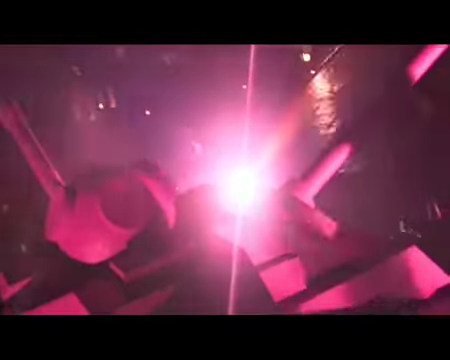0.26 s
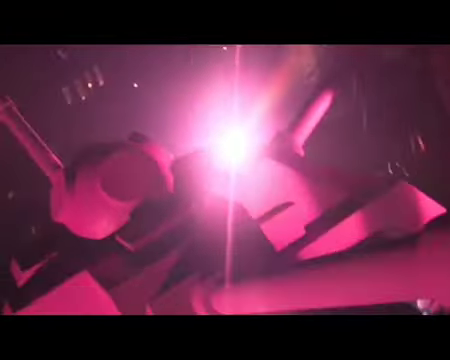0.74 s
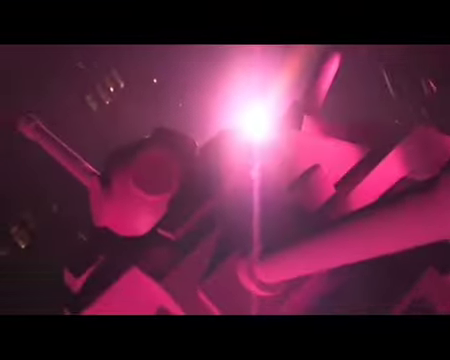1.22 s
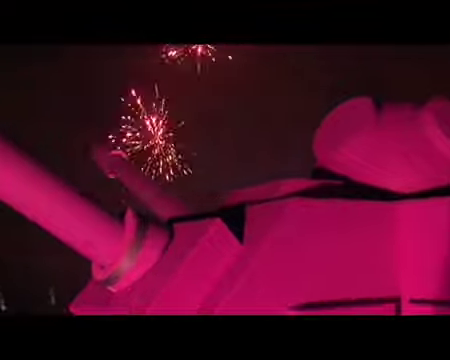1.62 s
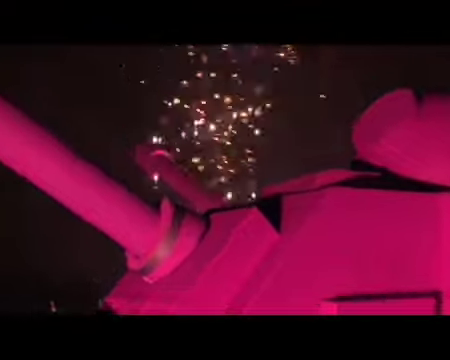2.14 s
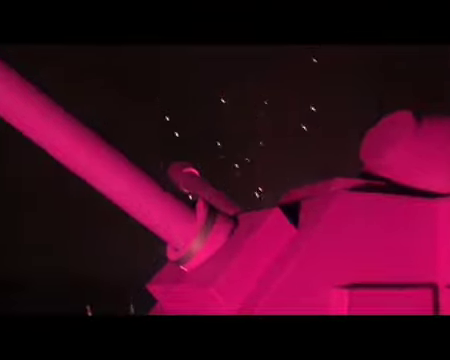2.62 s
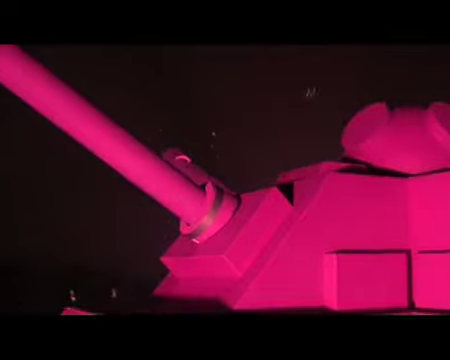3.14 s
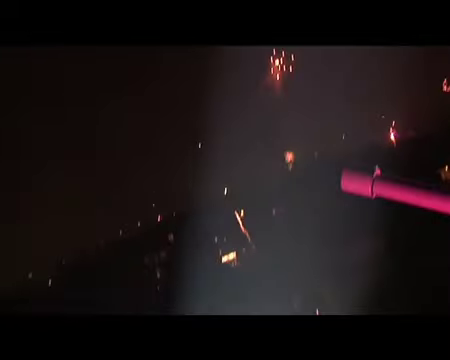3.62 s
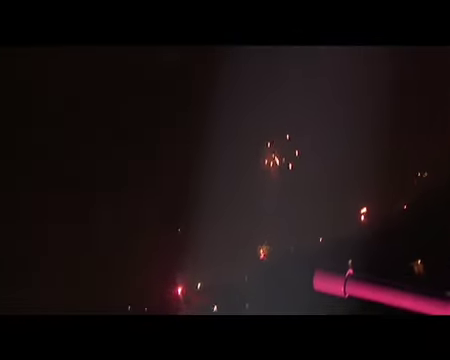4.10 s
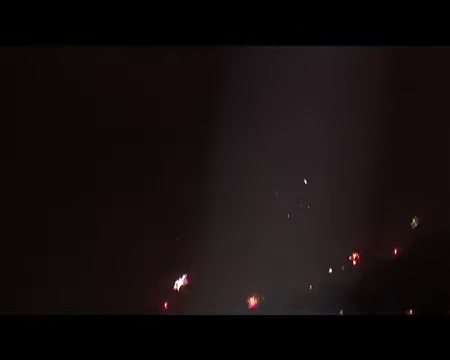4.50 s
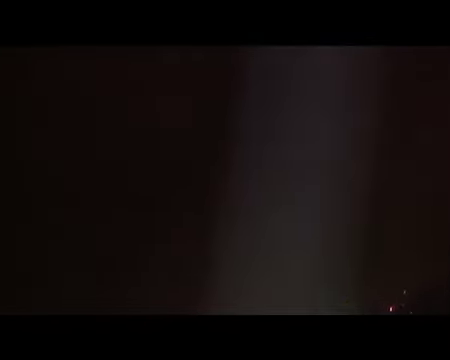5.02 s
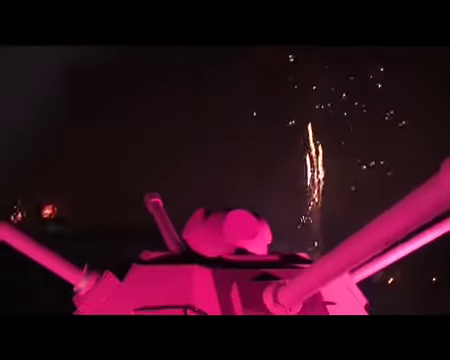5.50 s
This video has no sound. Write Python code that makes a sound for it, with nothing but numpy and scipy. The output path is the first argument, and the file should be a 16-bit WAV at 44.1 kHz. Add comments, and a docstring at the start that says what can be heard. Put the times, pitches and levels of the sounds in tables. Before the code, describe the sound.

Blunt mid-low bangs come irregularly from the start, with smaller pops a few streets away. Soon after one sharp bang, a brief hiss turns into dense crackle with bright snaps, fading over about a second. Later the heaviest cracks arrive, including a tight cluster near the end. A constant muffled barrage fills the night city; close wall slaps, clipped peaks, limited treble and a barely audible whine suggest a small camera.

```python
"""Shells and firecrackers bang near by at night: ringing thumps with steep cracks, thrown back by walls.
One bang trails a hiss, then a shell overhead sheds a cloud of crackling stars: tiny random puffs of noise
plus louder single snaps. Behind them countless far pops all over a city merge into a dull roar of
shaped noise. One overloaded camera microphone hears it all, with a housing reflection and a faint whine."""
import sys
import numpy as np
from scipy import signal
from scipy.fft import rfft, irfft
from scipy.io import wavfile

SR = 44100
rng = np.random.default_rng(int(sys.argv[2]) if len(sys.argv) > 2 else 0)


def bounce(signal):
    """Save signal as a 16-bit WAV file at the path given by the first command-line argument."""
    frames = np.transpose(np.atleast_2d(signal))
    limited = np.clip(frames, -1, 1)
    pcm = np.round(limited * 32767).astype(np.int16)
    wavfile.write(sys.argv[1], SR, pcm)


N = 254016
WALL_S = 0.029  # delay of the echo from the nearest walls

# relative spectrum of a crackling star: pitch_hz [Hz], level_db [dB per Hz]
STAR_SPECTRUM = [(1200, -25), (2500, 0), (4000, -3), (6000, -8), (8500, -20.5), (11500, -24), (13500, -34),
                 (16000, -55)]


def gain_of(db):
    """Decibels to a factor."""
    return 10 ** (np.asarray(db) / 20)


def evened(x):
    """Scales to rms 1."""
    return x / np.sqrt(np.mean(x ** 2) + 1e-20)


def read(points, hz):
    """Reads a curve at hz, with straight lines between its points over log frequency."""
    f, value = np.transpose(points)
    return np.interp(np.log(hz + 1), np.log(f + 1), value)


def add(mix, start_s, sound):
    """Adds a sound to the mix at its start time, cut off at the end of the scene."""
    part = mix[round(start_s * SR):][:len(sound)]
    part += sound[:len(part)]


def colour(x, points):
    """Causal (minimum-phase) filter with the given relative spectrum: nothing rings before a click."""
    hz = abs(np.fft.fftfreq(8192, 1 / SR))
    log_gain = np.log(gain_of(np.maximum(read(points, hz), -100)))
    response = np.exp(np.conj(signal.hilbert(log_gain)))
    taps = np.fft.ifft(response).real[:4096]
    return signal.oaconvolve(x, taps / np.linalg.norm(taps))[:len(x)]


def scatter(db, t60_s, rise_s, late_s=0):
    """Noise that the surroundings send back: it swells quickly after a delay, then dies."""
    t = np.maximum(np.arange(SR // 2) / SR - late_s, 0)
    envelope = gain_of(db - 60 * t / t60_s) * (1 - np.exp(-t / rise_s))
    return envelope * rng.standard_normal(len(t))


def popping(per_s, size_db, t60_s):
    """A random train of pops, a few of them large, each a short dying puff of noise."""
    happens = rng.random(N) < per_s / SR
    size = gain_of(size_db * np.minimum(rng.exponential(1, N), 4)) * happens
    puff = gain_of(-60 * np.arange(SR // 4) / SR / t60_s)
    power = signal.oaconvolve(size ** 2, puff ** 2)[:N]  # overlapping puffs add in power
    return np.sqrt(abs(power)) * rng.standard_normal(N)


def blast(pitch_hz, cycles, rise_ms):
    """A push and pull of air: a decaying sine with a rounded onset."""
    t = np.arange(SR // 2) / SR
    onset = 1 - np.exp(-(1000 * t / rise_ms) ** 2)
    return np.sin(2 * np.pi * pitch_hz * t + 1.0) * np.exp(-pitch_hz * t / cycles) * onset


def bangs():
    """Each shell or pop rings a few cycles, scatters off its surroundings, then returns from the walls."""
    # shells bursting near by: start_s [s], blast_db [dB], pitch_hz [Hz], ring [cycles], rise [ms],
    # scatter [dB re blast], scatter t60 [s], wall echo [dB re blast]
    shells = [(0.0426, 3, 405, 2.1, 3.6, -13.5, 0.099, -16), (0.4935, -1, 520, 0.76, 1.1, -6.5, 0.13, -5.5),
              (0.624, 5.5, 564, 2.5, 1.4, -11.5, 0.13, -14.5), (0.744, -3, 263, 5.3, 0.4, -4.5, 0.44, -4),
              (1.319, 1, 330, 0.96, 0.052, -6, 0.42, -9), (1.953, 0.5, 410, 2, 2.4, -10.5, 0.17, -7.5),
              (2.276, -9, 595, 1.8, 1.1, -2, 0.19, -16), (2.3, 2.5, 425, 1, 0.083, -7.5, 0.32, -29),
              (4.0291, 5.5, 586, 0.71, 0.35, -12, 0.097, -12), (4.404, -2.5, 226, 2, 5.2, -30, 0.11, -25),
              (4.5716, -2, 142, 1.6, 0.8, -5, 0.23, -6), (4.5983, 3.5, 422, 1.9, 0.03, -7, 0.2, -30),
              (5.0242, 2.5, 543, 1.1, 1.1, -9.5, 0.11, -8.5),
              (5.4108, 4, 453, 0.43, 0.053, -8.5, 0.23, -8.5),
              (5.65, -3.5, 704, 3.6, 1.1, -8.5, 0.093, -13)]
    # pops a few streets away that stand out of the roar: start_s [s], blast_db [dB], pitch_hz [Hz]
    street_pops = [(0.0698, -1, 510), (0.5279, -15, 550), (0.779, 0.5, 298), (0.798, -8, 596),
                   (0.8496, -10.5, 435), (1.392, -6, 400), (1.4172, -6, 400), (1.4395, -1.5, 387),
                   (1.5554, -8, 460), (1.6603, -4, 434), (1.754, -5, 490), (1.8636, -1.5, 740),
                   (1.8997, -5, 495), (2.0665, -5, 650), (2.226, -1, 434), (2.313, -3, 453),
                   (2.365, -7.5, 600), (2.352, -16, 370), (2.395, -6, 447), (2.4268, -8, 510),
                   (2.4676, -1.5, 453), (2.523, -5, 432), (2.771, -3.5, 440), (2.877, -12.5, 605),
                   (3.0292, -5.5, 560), (3.118, -3.5, 363), (3.409, -3.5, 584), (3.45, -2.5, 330),
                   (3.6805, -11, 427), (3.8574, -6, 504), (3.957, -13, 600), (4.064, -6, 970),
                   (4.1988, -8.5, 363), (4.2398, -6.5, 420), (4.4754, -8, 450), (4.733, -6, 490),
                   (4.952, -5.5, 540), (5.206, -4.5, 740), (5.472, -5.5, 496), (5.522, -3.5, 700),
                   (5.557, -5, 800), (5.6032, -8, 434), (5.7102, -6.5, 626)]
    # relative spectrum of the scattered blast: pitch_hz [Hz], level_db [dB per Hz]
    blast_spectrum = [(15, -44), (25, -31), (97, -15), (319, -3.5), (401, -5.5), (835, -11), (936, -6),
                      (1260, -16), (2190, -25), (6000, -53.5), (7800, -90), (13200, -120)]
    # blast back from the walls, thinner in the bass: pitch_hz [Hz], level_db [dB per Hz, relative]
    wall_spectrum = [(60, -47), (200, -0.5), (400, 3), (900, 3.5), (1300, -5.5), (2200, -13), (4000, -24.5),
                     (7000, -43.5), (12000, -65)]
    pop_settings = (1.23, 0.35, -11.5, 0.2, -10)  # the last five columns of the shells, same for each pop
    pops = [(*row, *pop_settings) for row in street_pops]
    direct, walls = np.zeros(N), np.zeros(N)
    for start_s, blast_db, pitch_hz, cycles, rise_ms, scatter_db, t60_s, wall_db in shells + pops:
        emphasis = [(pitch_hz / 3, -7), (pitch_hz, 0), (pitch_hz * 3, -7)]  # stands out around its pitch
        points = blast_spectrum + [(pitch_hz, read(blast_spectrum, pitch_hz))]
        shape = sorted((f, level + read(emphasis, f)) for f, level in points)
        scattered = colour(scatter(scatter_db, t60_s, 0.00099), shape)
        add(direct, start_s, gain_of(blast_db) * (blast(pitch_hz, cycles, rise_ms) + scattered))
        add(walls, start_s, scatter(blast_db + wall_db, 0.1, 0.011, WALL_S))
    return direct + colour(walls, wall_spectrum)


def cracks():
    """Steep fronts: a click, a burst a few ms long, a thin scattered hiss and a wall echo; air dulls some."""
    # sharp fronts of bangs and their single bounces off walls: start_s [s], front_db [dB],
    # scatter [dB re front], wall echo [dB re front], brightness [dB per octave]
    fronts = [(0.069, -19, -14, -21, -6), (0.6277, -27, -18, -21, 2), (0.7445, -11, -16, -24, 3.5),
              (0.78, -15.5, -9, -25, 0.5), (0.786, -12.5, -18, -27, -6), (1.319, -21, -13, -20, 11),
              (1.348, -22, -13, -30, 7), (1.358, -22, -14, -25, 1), (1.9, -20, -7, -18, -5),
              (2.2771, -10, -4, -19, -12), (2.288, -19, -10.5, -23, -2), (2.3, -14.5, -14, -14, 3.5),
              (2.352, -21, -11, -14, -2), (3.4459, -21, -11, -20, -5), (4.0291, -37, -20, -23, 10),
              (4.066, -17, -8, -25, -16), (4.599, -9, -19, -18, 2.5), (4.6048, -5.5, -25, -19, -2.5),
              (4.608, -22, -18, -21, -1.5), (5.411, -18, -16, -21, 8.5), (5.4142, -6, -18, -31, -3.5),
              (5.424, -9.5, -13, -25, -1), (5.433, -11.5, -14, -22, -3.5), (5.6503, -15.5, -21, -27, -3.5)]
    # relative spectrum of a front before its brightness tilt: pitch_hz [Hz], level_db [dB per Hz]
    front_spectrum = [(500, -29), (1200, -4), (2000, 9), (3000, 4), (5000, -3.5), (8000, -16.5),
                      (11500, -28.5), (13500, -36), (16000, -34)]
    # the loudest single stars: start_s [s], snap_db [dB]
    snaps = [(0.865, -36), (1.431, -33), (1.612, -33), (1.723, -39), (1.657, -31), (1.69, -35), (1.79, -28),
             (1.828, -29), (1.8708, -17), (1.912, -26), (1.953, -30), (1.985, -28), (2.0083, -21),
             (2.0646, -22), (2.095, -21), (2.1176, -27), (2.141, -21), (2.178, -30), (2.1913, -31),
             (2.217, -21), (2.234, -25), (2.272, -28), (2.31, -18.5), (2.429, -24), (2.4466, -29),
             (2.5373, -29), (2.6177, -34), (2.8162, -34), (2.836, -33), (2.85, -27), (2.9703, -34),
             (3.018, -34), (4.3214, -35), (4.7325, -31), (5.512, -35)]
    snap_settings = (-16, -25, 0.7)  # scatter and wall echo [dB re snap], brightness [dB per octave]
    events = [(*row, front_spectrum) for row in fronts]
    events += [(*row, *snap_settings, STAR_SPECTRUM) for row in snaps]
    out = np.zeros(N)
    for start_s, level_db, scatter_db, wall_db, tilt_db, spectrum in events:
        burst = scatter(-1.0, 0.011, 0.0001)
        hiss = scatter(scatter_db, 0.1, 0.0011)
        echo = scatter(wall_db, 0.085, 0.0015, WALL_S)
        crack = burst + hiss + echo
        crack[0] += 4.0  # the click
        shape = [(f, level + tilt_db * np.log2(f / 5000)) for f, level in spectrum]
        add(out, start_s, gain_of(level_db) * colour(crack, shape))
    return out


def tail_and_stars():
    """Random crackle over hiss: first the hissing tail of a shell, then a cloud of many small stars."""
    # level of the hissing tail of the shell at 1.32 s, then of the star cloud from 1.58 s:
    # start_s [s], level_db [dB]
    course = [(1.33, -34.5), (1.58, -44.5), (1.68, -37.5), (2.0, -38.5), (2.55, -43), (2.65, -51),
              (3.1, -60)]
    start_s, level_db = np.transpose(course)
    crackle = evened(popping(per_s=560.0, size_db=4.5, t60_s=0.013))
    hiss = rng.standard_normal(N)
    level = gain_of(np.interp(np.arange(N) / SR, start_s, level_db, left=-120, right=-120))
    return level * evened(colour(crackle + hiss, STAR_SPECTRUM))


def barrage():
    """Far pops overlap into a roar that brightens when nearer streets join in."""
    # course of the roar: start_s [s], level_db [dB], brightness [dB per octave above 1 kHz]
    course = [(0.0, -17, 2), (0.4, -19, 1.5), (0.66, -19.5, 2), (1.3, -19.5, 1.5), (1.52, -18, 0.5),
              (1.73, -18, 0), (2.17, -19, 1), (2.44, -17, 0), (2.84, -18, 1.5), (3.34, -18.5, 1.5),
              (4.32, -21, 2.5), (4.49, -19, 2), (4.62, -16.5, 2.5), (5.44, -19.5, 2.5), (5.61, -15, 2),
              (5.76, -17, 2.5)]
    # relative spectrum of the roar before its brightness tilt: pitch_hz [Hz], level_db [dB per Hz]
    roar_spectrum = [(15, -65), (25, -33), (50, -34), (97, -18), (217, -4), (309, -3), (430, -3), (660, -6),
                     (950, -6.5), (1330, -18.5), (2110, -24), (3000, -32), (5000, -46), (8000, -61),
                     (12000, -70.5), (16000, -78)]
    start_s, level_db, tilt_db = np.transpose(course)
    pops = evened(popping(per_s=160.0, size_db=2.0, t60_s=0.14))
    blur = 1.24 * rng.standard_normal(N)  # steady noise that fills the gaps
    roar = evened(colour(pops + blur, roar_spectrum))
    hz, t, bands = signal.stft(roar, SR, nperseg=512)
    octaves = np.log2(np.maximum(hz, 1000) / 1000)[:, None]
    tilt = gain_of(octaves * np.interp(t, start_s, tilt_db))
    roar = signal.istft(bands * tilt, SR, nperseg=512)[1][:N]
    return roar * gain_of(np.interp(np.arange(N) / SR, start_s, level_db))


def scene():
    """Everything reaches one microphone, so both channels carry the same sound."""
    mono = bangs() + cracks() + tail_and_stars() + barrage()
    return np.tile(mono, (2, 1))


def housing(dry):
    """A short inverted reflection in the camera housing notches the treble at even steps of 1740 Hz."""
    # strength of the reflection: pitch_hz [Hz], share [0-1]
    reflection = [(1500, 0), (3500, 0.11), (6000, 0.23), (16000, 0.35)]
    hz = np.fft.rfftfreq(N, 1 / SR)
    response = 1 - read(reflection, hz) * np.exp(-2j * np.pi * hz / 1740)
    return irfft(rfft(dry) * response, N)


def whine():
    """The camera's faint whine: a cluster of steady high sines."""
    # steady tones: pitch_hz [Hz], level_db [dB rms]
    tones = [(8850, -82), (9001, -80), (10051, -84), (10352, -85), (12150, -88), (12301, -87), (13049, -88),
             (13200, -88), (13550, -87), (13652, -86), (14400, -91), (14600, -91), (14702, -90),
             (15052, -88), (15149, -92), (15299, -92), (15601, -91)]
    t = np.arange(N) / SR
    return sum(np.sqrt(2) * gain_of(db) * np.sin(2 * np.pi * (f * t + rng.random())) for f, db in tones)


def overload(sound):
    """Each channel rounds off at its ceiling; the left amplifier drifts after an overload and settles."""
    # where the left and right channels overload: ceiling [amplitude]
    ceiling = [
        [1.05],
        [.99],
    ]
    level = sound / ceiling
    loud = ceiling * level / (1 + level ** 6) ** (1 / 6)  # clean below the ceiling, a round knee at it
    excess = np.maximum(abs(level[0]) - 0.9, 0)
    drift_filter = signal.butter(1, [4, 40], "band", fs=SR)  # band of the drift, Hz
    loud[0] += gain_of(5) * signal.lfilter(*drift_filter, excess)
    return loud


def record(dry):
    """The camera's path: housing reflection, whine, overload, then a steep treble limit."""
    loud = overload(housing(dry) + whine())
    taps = signal.firwin(511, 16100, window=("kaiser", 9), fs=SR)  # lowpass edge in Hz
    return signal.oaconvolve(loud, taps[None], "same")


dry = scene()
out = record(dry)
bounce(out)
```